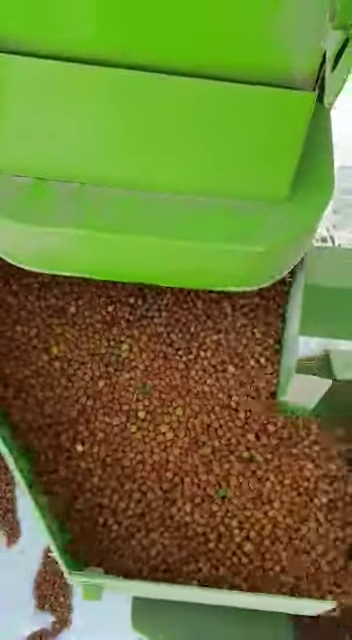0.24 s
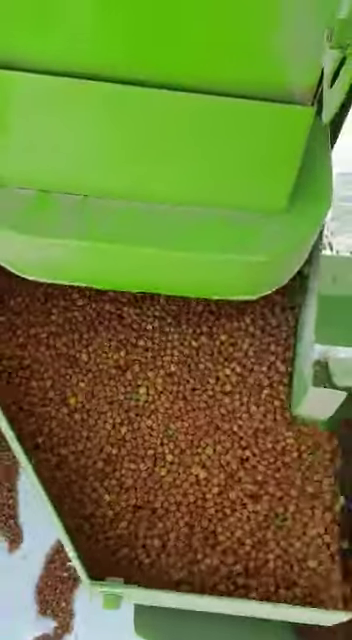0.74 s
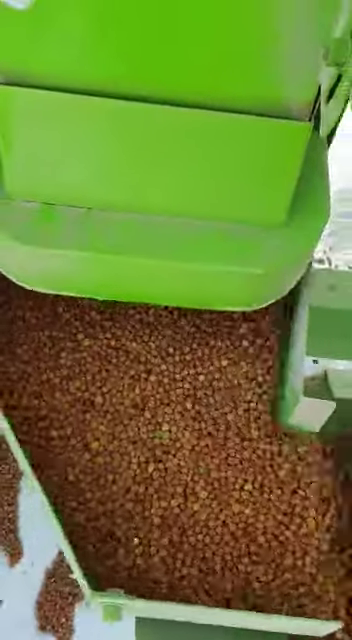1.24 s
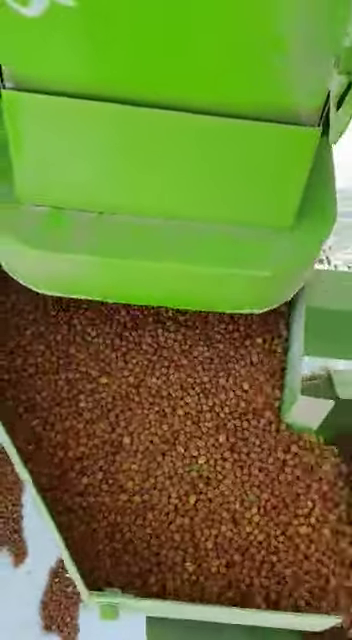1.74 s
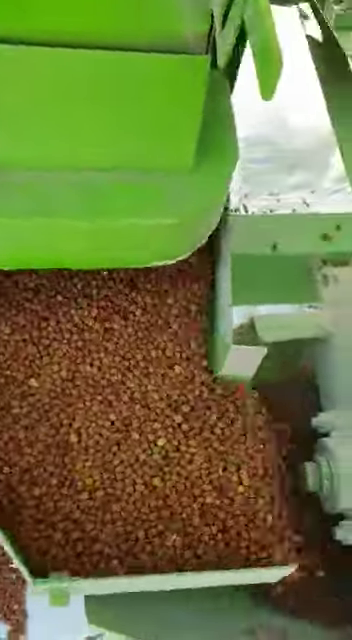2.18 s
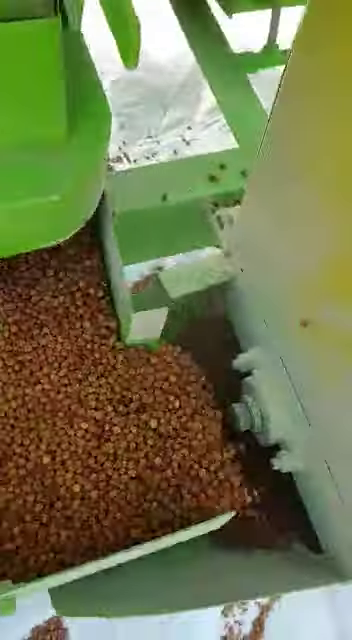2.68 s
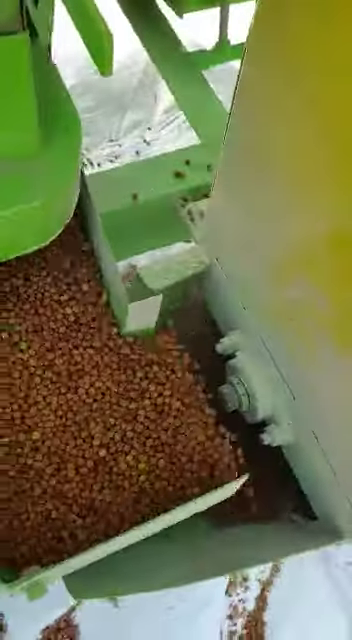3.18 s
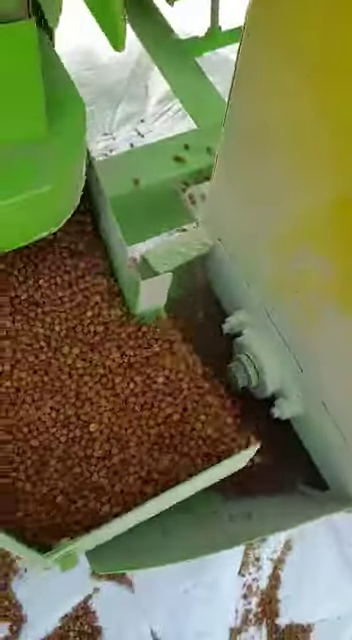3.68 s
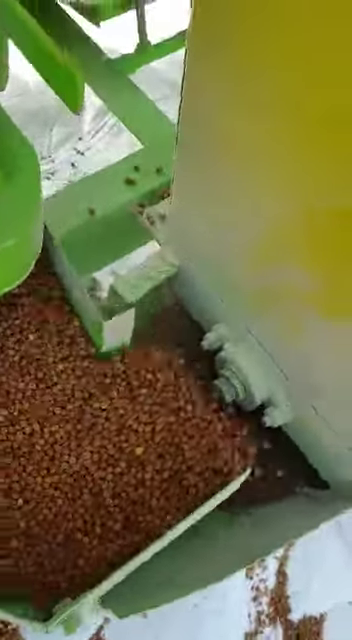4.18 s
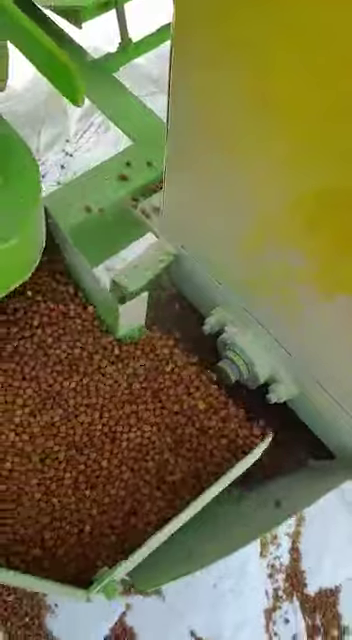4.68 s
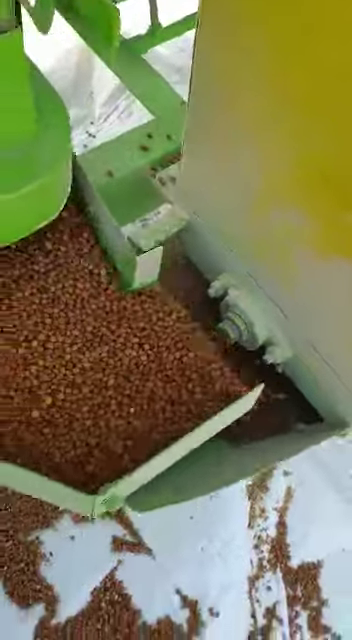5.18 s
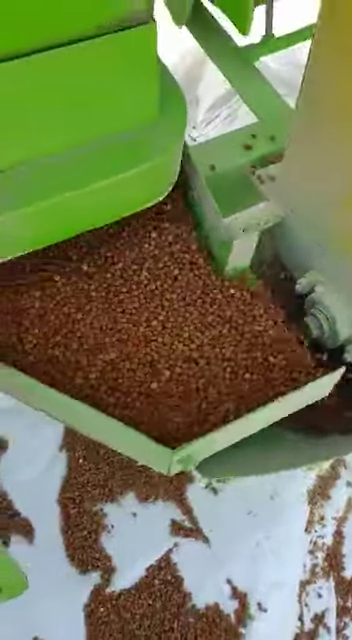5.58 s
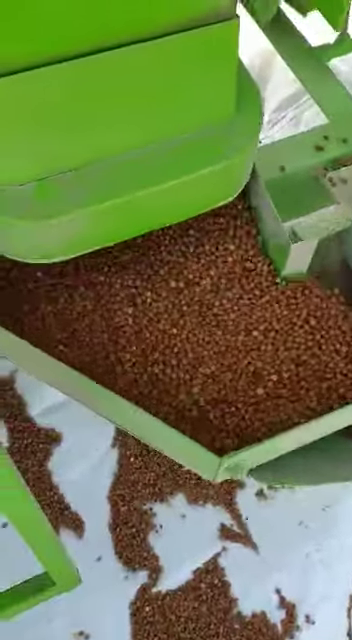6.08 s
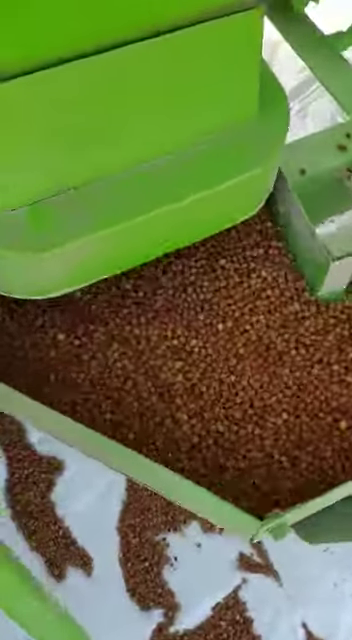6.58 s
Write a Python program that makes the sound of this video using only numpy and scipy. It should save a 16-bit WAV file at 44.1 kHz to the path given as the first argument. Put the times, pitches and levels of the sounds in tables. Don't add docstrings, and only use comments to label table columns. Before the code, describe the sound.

Low engine hum and shaking sheet-metal roar, with rapid puffing seed hiss, loose guards buzzing and irregular soft thuds on a hopper.

```python
import sys
import numpy as np
from scipy import signal
from scipy.fft import rfft, irfft, next_fast_len
from scipy.io import wavfile
from scipy.ndimage import uniform_filter1d, map_coordinates

SR = 44100
rng = np.random.default_rng(int(sys.argv[2]) if len(sys.argv) > 2 else 0)


def makeup_ratio(level_db):
    decades = np.asarray(level_db, float) / 20
    return 10 ** decades


def dump_mix(stems):
    frames = np.atleast_2d(stems).T
    limited = np.clip(frames, -1, 1)
    pcm = np.round(limited * 32767).astype(np.int16)
    wavfile.write(sys.argv[1], SR, pcm)


N = 301644
T = np.arange(N) / SR

# start_s, left_over_right_db
PAN = [(0, -7.5), (2.4, -5.5), (2.84, -2), (3.56, -4), (5.6, -1.5), (6.2, -2.5), (6.28, -10.5), (6.65, -11),
       (6.84, -12.5)]


def unit(x):
    return x / np.sqrt(np.mean(x ** 2) + 1e-20)


def along(points, hz):
    f, *cols = np.transpose(points)
    return [np.interp(np.log(hz + 1), np.log(f + 1), c) for c in cols]


def curves(rows):
    s, *cols = np.transpose(rows)
    return [np.interp(T, s, c) for c in cols]


def wobble(rate):
    coarse = T[::64]
    knots = rng.standard_normal(int(N * rate / SR) + 4)
    return np.interp(T, coarse, map_coordinates(knots, [coarse * rate]))


def filtered(x, response):
    m = next_fast_len(N + SR // 2)
    return irfft(rfft(x, m) * response(np.fft.rfftfreq(m, 1 / SR)), m)[..., :N]


def shape(points):
    return lambda hz: makeup_ratio(along(points, hz)[0])


def resonances(modes, f):
    return np.abs(sum(makeup_ratio(db) * 1j * f * w / (c * c - f * f + 1j * f * w) for c, w, db in modes))


def rush(colour, patchy_db, tick_share=0., ticks=4000):
    z = signal.stft(rng.standard_normal((2, N)), nperseg=512)[2]
    field = uniform_filter1d(rng.standard_normal(z.shape[1:]), size=6, axis=0)
    field = uniform_filter1d(field, size=10, axis=1)
    air = signal.istft(z * makeup_ratio(patchy_db * unit(field)), nperseg=512)[1][:, :N]
    hits = unit((rng.random((2, N)) < ticks / SR) * rng.standard_normal((2, N)))
    share = np.clip(tick_share, 0, 1)
    return unit(filtered(np.sqrt(1 - share) * unit(air) + np.sqrt(share) * hits, colour))


def rings(events, t60, rise):
    out, t = np.zeros(N + SR), np.arange(SR // 5) / SR
    for s, db, hz in events:
        envelope = makeup_ratio(db - 60 * t / t60) * (1 - np.exp(-t / rise))
        out[round(s * SR):][:len(t)] -= envelope * np.sin(2 * np.pi * hz * t)
    return out[:N]


def ports(pair):
    # pitch_hz, likeness_0_to_1, left_lead_radians, left_over_right_db
    port_table = [(47, 0.97, 0.24, -12), (150, 0.99, 0.22, -11), (250, 0.98, 0.46, -12),
                  (355, 1, 0.93, -14), (467, 0.9, 1.35, -10), (700, 0.37, 1.5, -8), (1020, 0.63, 1.6, -6),
                  (1380, 0.17, 2.8, -4.5), (2070, 0.1, 3.45, -3.5), (2920, 0.35, 7.8, 6),
                  (4220, 0, 5.4, 3.5), (6000, 0.13, 7.3, 14), (8500, 0, 6, 4.5), (15000, .04, 6.3, -6.5)]

    def mix(hz):
        alike, lag, pan_db = along(port_table, hz)
        turn = np.arccos(np.clip(alike, 0, 1)) / 2
        left = makeup_ratio(pan_db / 2) * np.exp(.5j * lag)
        right = makeup_ratio(-pan_db / 2) * np.exp(-.5j * lag)
        power = left * left.conj() + right * right.conj() + 2 * alike * np.cos(lag)
        middle = np.sqrt(power).real / 2
        to_left = [left * np.cos(turn), left * np.sin(turn)]
        to_right = [right * np.cos(turn), -right * np.sin(turn)]
        return np.array([to_left, to_right]) / middle
    return filtered(pair, mix).sum(axis=1)


def engine():
    # start_s, firing_rate_hz, firing_tone_level_db
    firing = [(0.0, 46.84, -18.5), (0.12, 46.3, -21), (0.72, 46.68, -20.5), (1.92, 46.8, -21),
              (2.52, 46.55, -21.2), (3.12, 47.07, -21), (4.1, 46.86, -21.5), (4.36, 46.76, -19.5),
              (4.92, 46.76, -20.5), (5.52, 46.5, -20), (6.12, 46.33, -21.5), (6.84, 46.46, -20)]
    # multiple_of_firing_rate, level_against_firing_tone_db
    orders = [(1.245, -20), (1.865, -17), (2, -20.5), (3, -18), (4, -16), (4.5, -17), (5, -31), (6, -29),
              (7.5, -15), (9, -39), (13.5, -46)]
    rate_hz, level_db = curves(firing)
    phase = 2 * np.pi * np.cumsum(rate_hz) / SR
    lines = 0
    for k, db in orders:
        level = makeup_ratio(db + 2.2 * wobble(3.05))
        lines = lines + level * np.sin(k * phase + 0.28 * k * wobble(2) + rng.uniform(0, 2 * np.pi))
    tone = makeup_ratio(0.27 * wobble(7.3)) * np.sin(phase)
    return np.sqrt(2) * makeup_ratio(level_db) * (tone + lines)


def casing():
    # start_s, casing_roar_level_db
    load = [(0.0, -24), (0.27, -22), (0.42, -19), (0.51, -22.5), (0.8, -22.5), (1.08, -22.5), (1.69, -22),
            (2.08, -20.5), (2.13, -23.5), (2.74, -23.5), (3.09, -25), (3.26, -20), (3.47, -26),
            (4.42, -21.5), (4.57, -20), (5.5, -25.5), (6.48, -22), (6.84, -24)]
    # pitch_hz, width_hz, level_db
    panel_modes = [(96, 18, -12.5), (136, 9.6, -3.5), (158, 11, -5), (237, 20, -1.5), (263, 15, 1),
                   (345, 14.7, 0.5), (432, 22, -14.5)]
    # pitch_hz, level_db
    roar_colour = [(25, -23), (50, -5), (100, -1), (250, 8.5), (380, 1), (500, -21), (900, -50),
                   (1500, -102)]
    roar_db, = curves(load)
    rumble_db = -28 + 0.79 * (roar_db - roar_db.mean()) + 1.5 * wobble(5)
    panels = lambda f: makeup_ratio(along(roar_colour, f)[0] + 0.5) + resonances(panel_modes, f)
    shaking = rush(panels, patchy_db=0.38)
    frame = filtered(shaking, lambda hz: 1 / (1 + (hz / 165) ** 8))
    surge_db = 1.15 * wobble(13)
    roar = makeup_ratio(roar_db - 0.1 + surge_db) * unit(shaking - frame)
    return roar + makeup_ratio(rumble_db - 1.0 + surge_db) * unit(frame)


def seed():
    # start_s, spray_level_db
    flow = [(0, -39.5), (.32, -39.5), (1.1, -38.5), (1.55, -39.5), (1.8, -41), (2.3, -41), (3.35, -41.5),
            (4.1, -39.5), (4.55, -39), (5, -41), (5.45, -41), (5.9, -41), (6.25, -41), (6.3, -37),
            (6.55, -40), (6.84, -39.5)]
    # start_s, drum_turns
    drum = [(0.0, 0.008), (1.37, 8.567), (2.74, 17.011), (4.1, 25.331), (5.47, 33.799), (6.84, 42.176)]
    # place_in_turn, puff_db, tail_turns
    throws = [
        (.895, 3.5, .115),
        (.265, 3.2, .065),
    ]
    # pitch_hz, level_db
    hiss_colour = [(1200, -28), (2200, -4.5), (2900, -4), (4200, 0), (5000, -2), (5800, -4.5),
                   (7000, -12.5), (8500, -22), (10000, -30)]
    # pitch_hz, level_db
    spray_colour = [(7000, -38), (8500, -14), (10000, -4), (11700, 2), (13500, 2), (15600, 0.5),
                    (16000, -11)]
    spray_db, = curves(flow)
    hiss_db = -36.5 + 0.81 * (spray_db - spray_db.mean())
    turns = curves(drum)[0] + .375 * ((T > .33) & (T < 3.43))
    fine = coarse = 0
    for at, puff_db, tail in throws:
        whole = np.round(turns - at)
        more, lag = rng.standard_normal((2, 64))[:, whole.astype(int) + 2]
        handful = puff_db * (1 + .14 * more)
        late = turns - at - whole + .015 * lag
        fine = fine + handful * np.exp(-(late / np.where(late < 0, .045, tail)) ** 2)
        coarse = coarse + handful * np.exp(-(late / np.where(late < 0, .06, 1.45 * tail)) ** 2)
    stir = .7 * wobble(32) + .2 * wobble(9)
    hiss = makeup_ratio(hiss_db + 0.64 * coarse + stir) * rush(shape(hiss_colour), patchy_db=1.0, tick_share=0.28)
    grains = rush(shape(spray_colour), patchy_db=0.2, tick_share=0.26, ticks=4900)
    return hiss + makeup_ratio(spray_db + 1.2 * fine + stir) * grains


def rattle():
    # start_s, level_db
    toward = [(0, 1), (.86, 2.5), (1.26, 2), (1.66, .5), (2.4, 0.5), (2.84, -2.5), (3.2, 0), (3.35, -1.5),
              (3.56, -.5), (4.06, 0.5), (4.51, 1), (5.11, -1.5), (5.6, -1), (6.2, -1), (6.28, 1), (6.46, 1),
              (6.65, 2.5), (6.84, 1)]
    # pitch_hz, level_db
    buzz_colour = [(250, -32), (450, 6), (700, 1), (900, -1.5), (1220, -43), (2000, -44.5)]
    # pitch_hz, width_hz, level_db
    guard_modes = [(786, 37, 0.35), (984, 20, -1), (1113, 27, -1.5), (619, 35, -2.5)]
    # pitch_hz, level_db
    chatter_colour = [(600, -26), (1000, 1.5), (1400, 0), (2000, -2), (2830, -11.5), (4000, -31)]
    (toward_db,), (pan_db,) = curves(toward), curves(PAN)
    shake = wobble(7)
    plates = rush(shape(buzz_colour), patchy_db=1.7, tick_share=0.12, ticks=1500)
    buzz = makeup_ratio(-35 + 0.38 * toward_db + 1.0 * shake) * plates
    ring = unit(filtered(rng.standard_normal((2, N)), lambda f: resonances(guard_modes, f) ** 2))
    buzz = buzz + makeup_ratio(-44 + 1.6 * toward_db) * ring
    bright = rush(shape(chatter_colour), patchy_db=1.1, tick_share=.15, ticks=2500)
    chatter = makeup_ratio(-38.5 + toward_db + .5 * shake) * bright
    turn_db = pan_db - pan_db.mean()
    return buzz, ports(chatter) * makeup_ratio([turn_db / 2, -turn_db / 2])


def thumps():
    # start_s, peak_level_db, wall_pitch_hz, rim_against_wall_db
    big = [(0.211, -11, 252, -11), (0.269, -13, 236, -15), (0.301, -7, 244, -10), (0.514, -11, 245, -11),
           (0.805, -8.5, 260, -20), (1.143, -9, 258, -4.5), (1.21, -11.5, 242.6, 4), (1.258, -13, 274, -7),
           (1.338, -10.5, 251, -18), (1.507, -13, 250, -18), (1.736, -8, 242, 1), (1.837, -10, 253, -19),
           (1.958, -8.5, 230, -17), (2.049, -7, 247, -9), (2.074, -11, 231, 0), (3.26, -16, 216, -5),
           (3.837, -7.5, 257, -13), (4.525, -10.5, 257, -20), (4.464, -13, 287, -4), (4.78, -7.5, 248, -20),
           (4.885, -10.5, 252.4, -15), (4.921, -12, 237, -6), (4.988, -8, 254, -22), (5.314, -9, 250, -9),
           (5.74, -7.5, 265.3, -2), (6.139, -10, 258, -32), (6.203, -12.5, 266.4, -17),
           (6.456, -8, 256, -20), (6.515, -9.5, 280.6, -11), (6.644, -12, 243, -8)]
    # start_s, peak_level_db
    knocks = [(1.473, -21), (2.068, -25), (3.177, -21), (3.907, -27), (4.342, -32), (5.371, -26),
              (6.499, -26)]
    when, chance = rng.uniform(0, N / SR, size=40), rng.standard_normal((40, 3))
    small = [-18.5, 236, -10] + chance * [2.5, 24.4, 6]
    lumps = np.vstack([big, np.column_stack([when, small])])
    wall = rings(lumps[:, :3], t60=0.17, rise=0.0038)
    low = rings([(s, db - 7, .66 * hz) for s, db, hz, _ in lumps], t60=0.16, rise=0.0086)
    rim = rings([(s, db + rim_db + 1, 348) for s, db, _, rim_db in lumps], t60=0.08, rise=0.006)
    plate = 0
    for hz, level in [(760, 4.5), (800, 2.5), (860, 0)]:
        plate = plate + rings([(s, db + level - 4.0, hz) for s, db in knocks], t60=0.11, rise=0.0052)
    return wall + low + rim + plate


def scene():
    solid = engine() + thumps()
    buzz, chatter = rattle()
    heard = ports(casing() + seed() + buzz + [solid, 0 * solid])
    treble = filtered(heard, lambda hz: 1 / (1 + (2500 / (hz + 1)) ** 4))
    pan_db, = curves(PAN)
    turn_db = 0.19 * (pan_db - pan_db.mean())
    return heard - treble + treble * makeup_ratio([turn_db, -turn_db]) + chatter


def low_pass(x):
    return signal.sosfilt(signal.butter(12, 15960, fs=SR, output="sos"), x)


def record(dry):
    held = dry / (1 + np.abs(dry) ** 8) ** (1 / 8)
    return low_pass(filtered(held, lambda hz: hz < 15920))


dry = scene()
out = record(dry)
dump_mix(out)
```